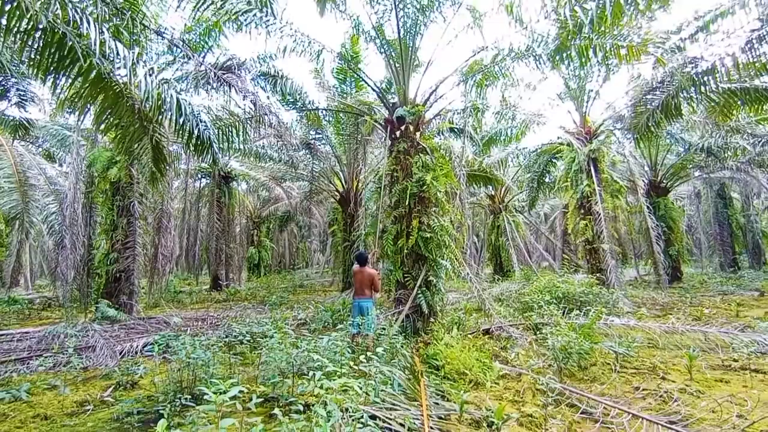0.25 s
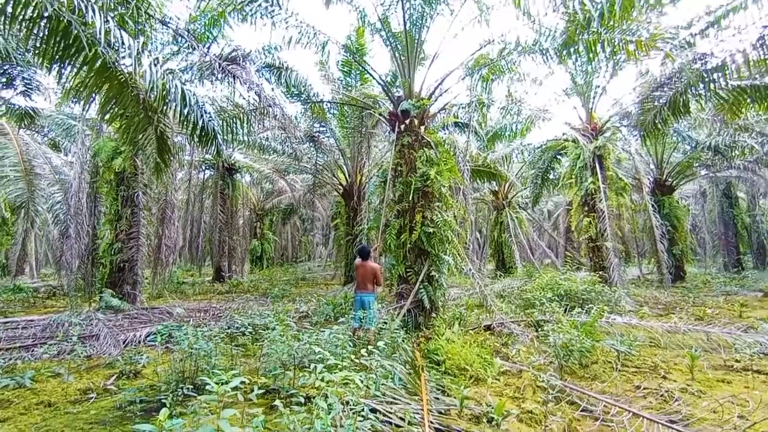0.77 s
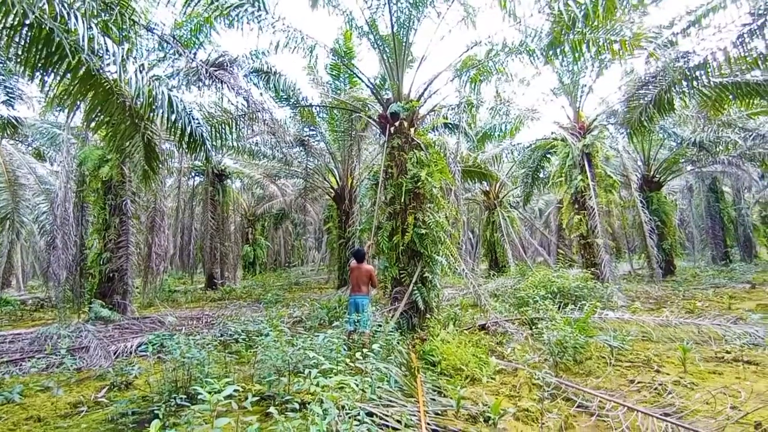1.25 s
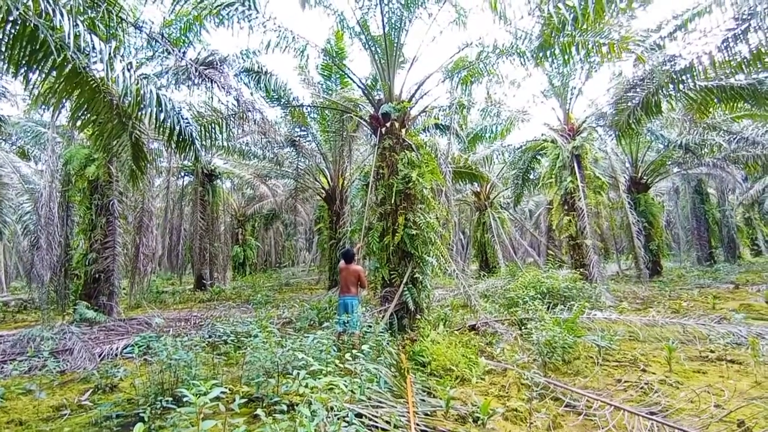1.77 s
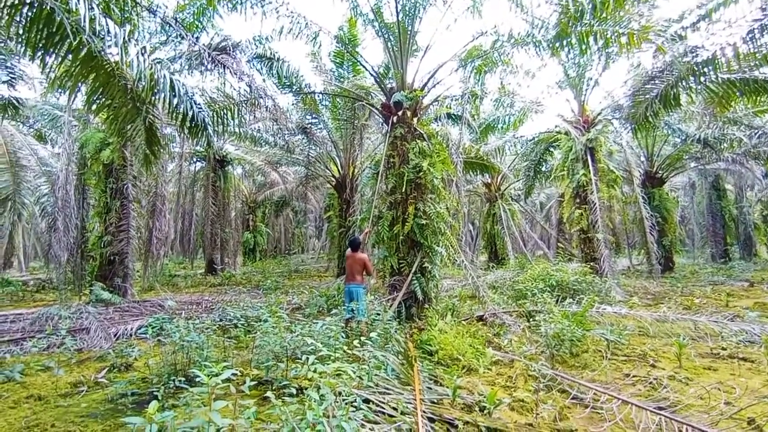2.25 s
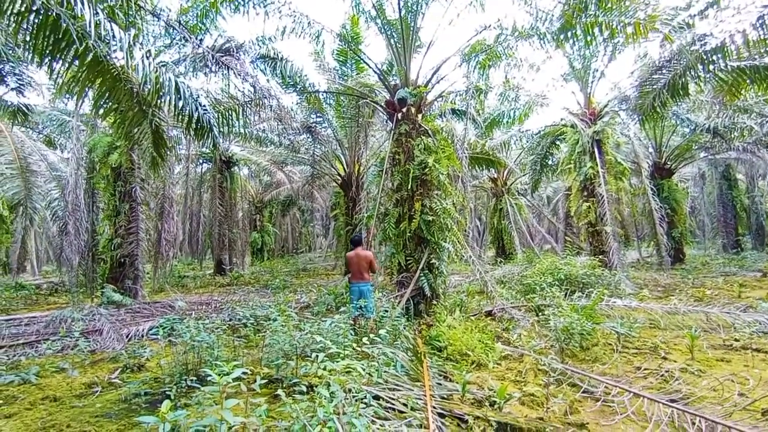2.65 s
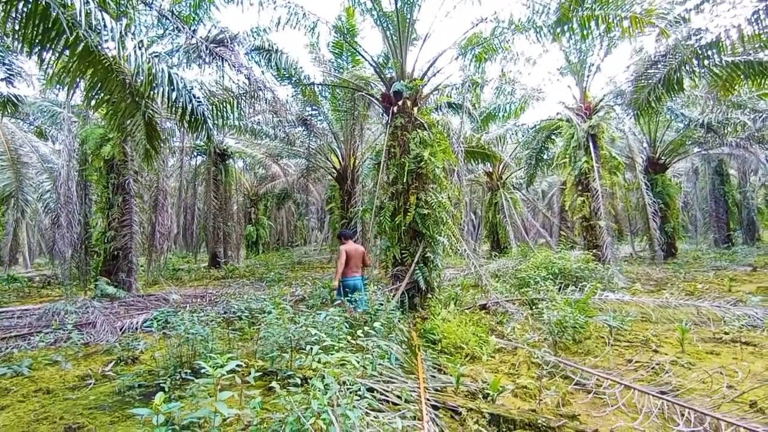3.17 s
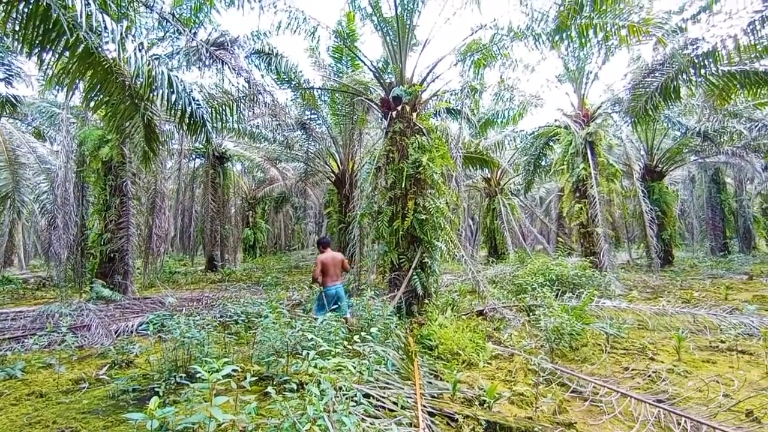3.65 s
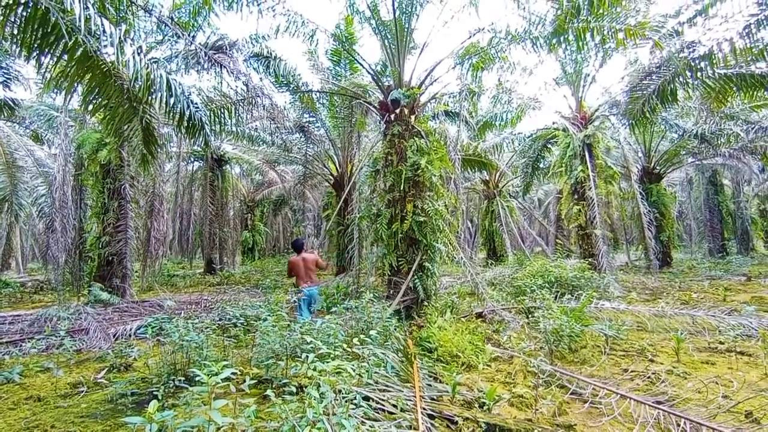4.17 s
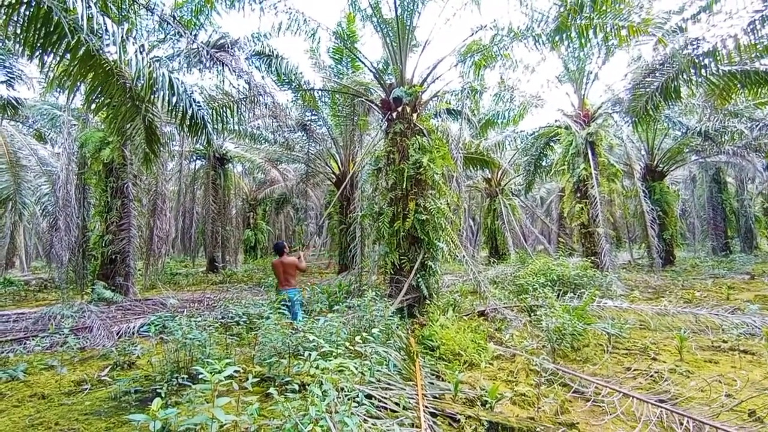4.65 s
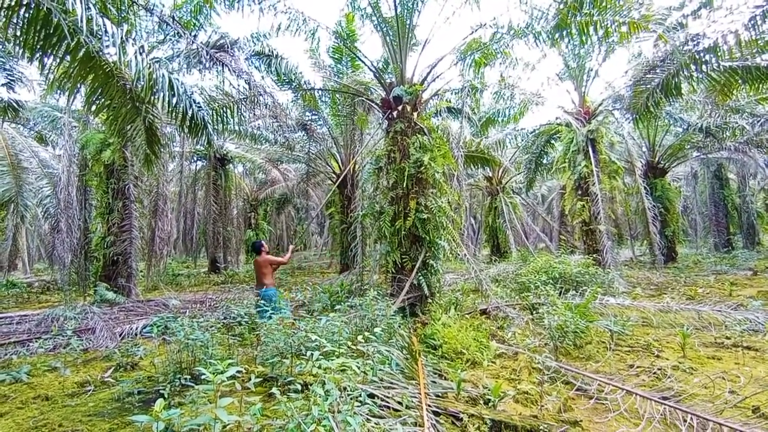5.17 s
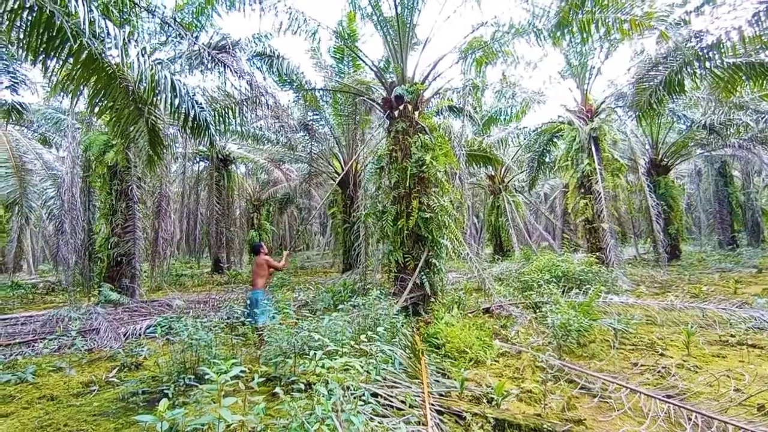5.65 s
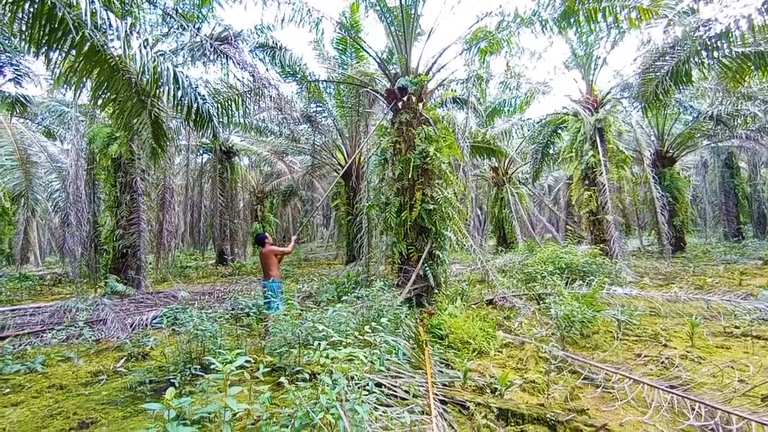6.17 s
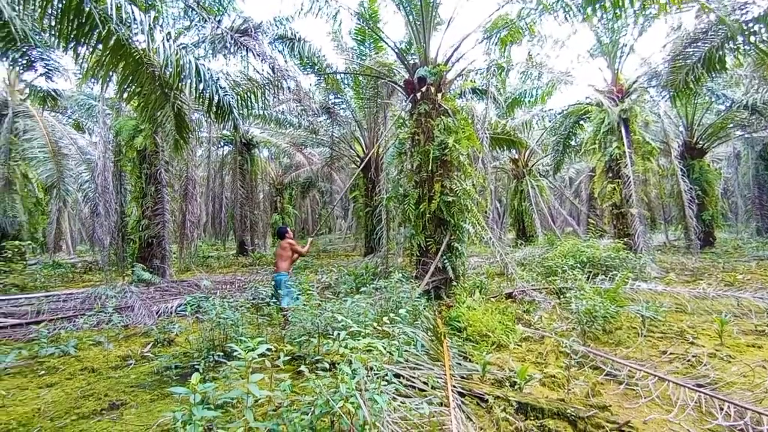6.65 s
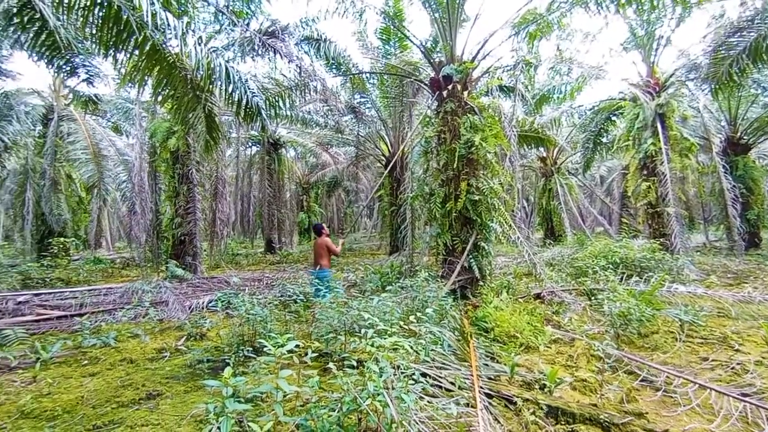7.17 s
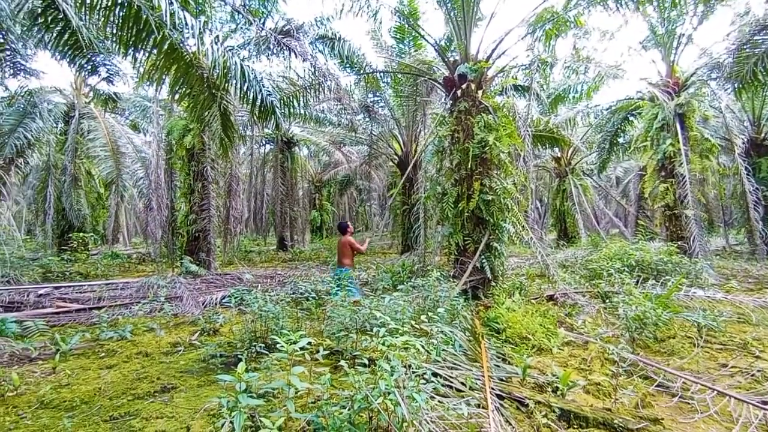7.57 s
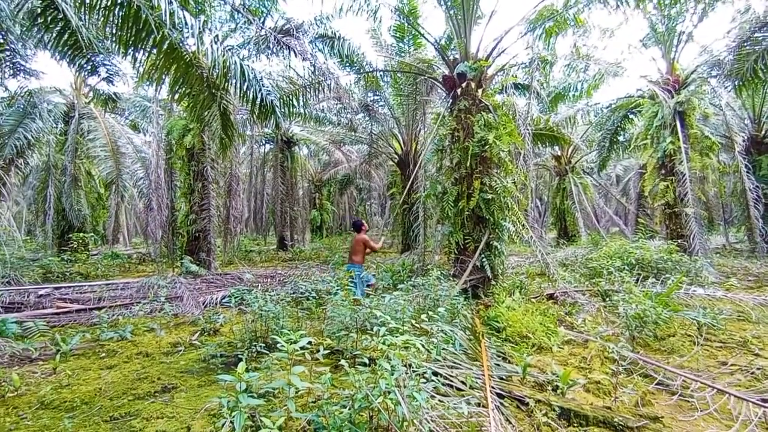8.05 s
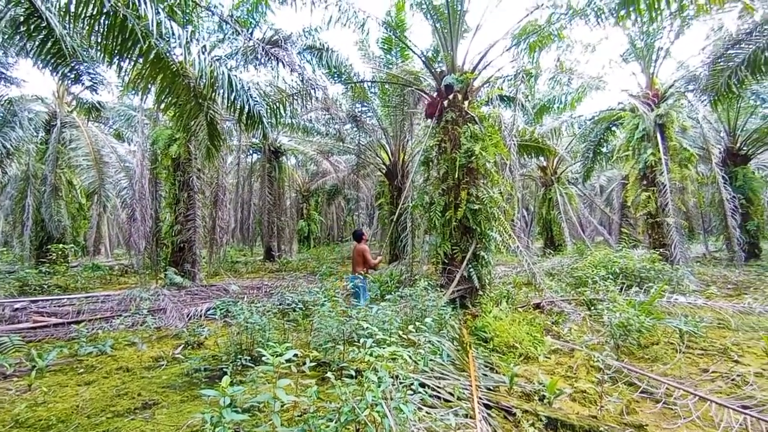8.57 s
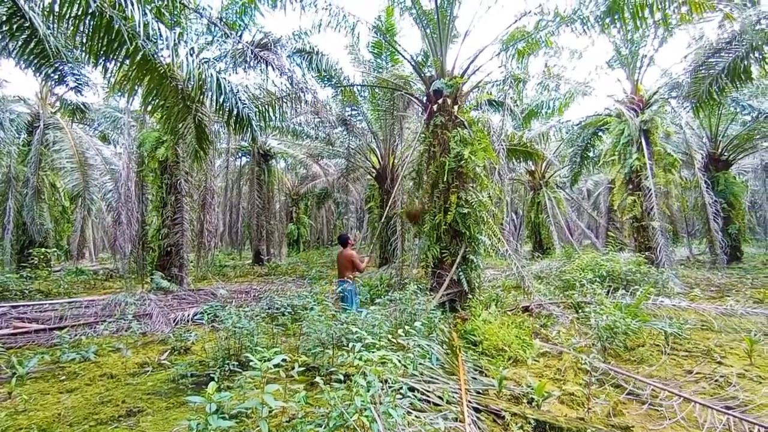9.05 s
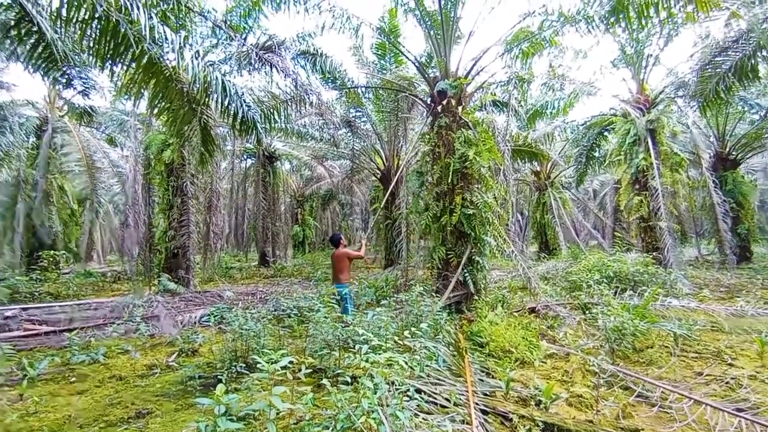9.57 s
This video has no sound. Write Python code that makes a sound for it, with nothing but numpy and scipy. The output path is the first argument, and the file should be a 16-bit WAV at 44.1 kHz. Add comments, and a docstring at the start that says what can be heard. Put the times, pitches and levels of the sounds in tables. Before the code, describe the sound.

Outdoors in a palm grove, a few metres from a stereo microphone, a sickle on a hollow pole knocks irregularly among dry snaps and light rustle. After a quieter gap, cracks build to one very loud snap that shakes the leaflets. Scrapes and hollow knocks follow in clusters, then rustling swells and a cut load lands with a soft thud. Faint insect hiss and low hum continue throughout.

```python
"""Under palms, a few metres from a two-port microphone, a sickle on a long hollow pole works in the fronds.
First the pole knocks amid dry snaps and rustle; near 2.4 s a far bird peeps; at 3.9 s the loudest snap
shakes the leaflets. From 5.7 s scrapes and knocks return, and at 9.5 s a cut load thuds down. Insects hiss
over a low hum throughout. Shaped noise makes rustle and snaps, and rings resonances as pole and trunk;
gliding sines make thunks and bird. Left and right differ most in the treble; leaflets peak near 10 kHz."""
import sys
import numpy as np
from scipy import signal
from scipy.fft import irfft, next_fast_len
from scipy.io import wavfile
from scipy.ndimage import uniform_filter1d

SR = 44100
rng = np.random.default_rng(int(sys.argv[2]) if len(sys.argv) > 2 else 0)


def unload_audio(sound):
    """Save the sound as a 16-bit wav file, at the path given as the first command line argument."""
    columns = np.transpose(np.atleast_2d(sound))
    # keep every value between -1 and 1, then stretch to whole-number steps
    steps = np.round(np.clip(columns, -1, 1) * 32767)
    wavfile.write(sys.argv[1], SR, steps.astype(np.int16))


def linear_from_db(decibels):
    """Turn decibels (scalar or array-like) into linear amplitude factors; 0 gives 1."""
    return 10 ** (np.asarray(decibels, float) / 20)


N = 433042  # samples
TIME = np.arange(N) / SR  # s
SIZE = next_fast_len(N)
HZ = np.arange(SIZE // 2 + 1) * SR / SIZE + 1e-3  # just above zero, so that its log exists


def on_hz(points):
    """A (Hz, value) table read at every frequency bin, along log frequency."""
    hz, value = np.transpose(points)
    return np.interp(np.log(HZ), np.log(hz), value)


def unit(x):
    """Scaled to rms 1."""
    return x / np.sqrt(np.mean(x ** 2))


def pair(alike, points):
    """Noise of rms 1 with a (Hz, dB) spectrum for both ports, as alike per frequency as the table says."""
    likeness = np.clip(on_hz(alike), -1, 1)
    mid, side = rng.standard_normal((2, len(HZ), 2)) @ [1, 1j]
    opposite = np.array([[1], [-1]])
    both = mid * np.sqrt(1 + likeness) + side * np.sqrt(1 - likeness) * opposite
    return unit(irfft(both * linear_from_db(on_hz(points)), SIZE)[:, :N])


def walk(rate):
    """Random levels held 1 / rate s and slewed; rms 1."""
    hold = int(SR / rate)
    steps = np.repeat(rng.standard_normal(N // hold + 1), hold)
    return unit(uniform_filter1d(steps, hold)[:N])


def crackle(rate, spread_db, t60):
    """Envelope of rms 1 made of random contacts, a few far louder than the rest."""
    loudness = linear_from_db(spread_db * np.minimum(rng.exponential(size=N), 2.4))
    hits = (rng.random(N) < rate / SR) * loudness
    return unit(signal.lfilter([1], [1, -1000 ** (-1 / (t60 * SR))], hits))


def blows(times, db, t60, rise=0.00092):
    """Envelopes, one for each row of db, that swell fast at each blow and die away."""
    gains = linear_from_db(np.atleast_2d(db))
    out = np.zeros((len(gains), N))
    for start, gain, decay in zip(times, gains.T, t60):
        first = int(start * SR)
        decay = np.clip(decay, .003, .4)
        age = TIME[:min(N - first, int(decay * SR))]
        shape = (1 - np.exp(-age / rise)) * 1000 ** (-age / decay)
        out[:, first:first + len(age)] += gain[:, None] * shape
    return out


def swells(times, db, rise, fall):
    """Envelopes, one for each row of db, that climb 20 dB in rise s to each peak and drop 20 dB in fall s."""
    db = np.atleast_2d(db)
    power = np.zeros((len(db), N))
    rise, fall = np.maximum(rise, .002), np.maximum(fall, .002)
    for peak, top_db, up, down in zip(times, db.T, rise, fall):
        span = slice(max(int((peak - 2 * up) * SR), 0), int((peak + 2 * down) * SR))
        t = TIME[span] - peak
        drop_db = 20 * np.maximum(-t / up, t / down)
        power[:, span] += linear_from_db(2 * (top_db[:, None] - drop_db))
    return np.sqrt(power)


def mode(x, hz, width, db):
    """One two-pole resonance, about db at its centre."""
    r = np.exp(-np.pi * width / SR)
    poles = [1, -2 * r * np.cos(2 * np.pi * hz / SR), r * r]
    return linear_from_db(db) * (1 - r) * signal.lfilter([1, 0, -1], poles, x)


# likeness of left and right for sounds a few metres off: pitch_hz, correlation
ALIKE_NEAR = [(60, 0.87), (200, 1), (1400, 0.78), (3000, 0.27), (5000, 0.012), (15000, -0.09)]
# knocks of the pole, before its modes: start_s, level_db, thud_db (push on the trunk), favoured pitch_hz
KNOCKS = [(0.208, -54, -68, 1250), (0.235, -44, -79, 1620), (0.325, -57, -81, 1600),
          (0.379, -48, -63, 1100), (0.419, -45, -53.5, 2310), (0.454, -48, -71, 2780),
          (0.611, -54, -55.5, 3000), (0.734, -53.5, -58.5, 1170), (0.919, -50.5, -68, 2300),
          (0.973, -42.5, -55, 2910), (1.037, -42.5, -61, 1740), (1.162, -50.5, -51, 1520),
          (1.238, -53, -59, 1060), (1.321, -41, -50, 1470), (1.349, -49, -50, 627), (1.435, -36, -54, 633),
          (1.508, -57, -54, 716), (1.545, -43.5, -72, 1540), (1.683, -43, -55, 1490),
          (1.758, -48.5, -57, 1540), (1.841, -52, -74, 1030), (1.899, -51, -80, 1500),
          (1.94, -44.5, -57, 1550), (2.038, -50, -67, 1160), (2.108, -54, -61, 1070),
          (2.125, -43.5, -64, 1060), (2.219, -53.5, -68, 657), (2.48, -59, -68, 657),
          (3.067, -55, -63, 694), (3.529, -45, -55.5, 2990), (3.927, -36, -59, 2680),
          (4.194, -53.5, -73, 2710), (4.357, -46, -63, 1720), (4.397, -41, -53, 1170),
          (4.527, -43, -69, 2880), (4.953, -54, -59.5, 740), (5.126, -60.5, -66, 1600),
          (5.757, -50, -58, 1570), (5.784, -46, -63, 1640), (5.844, -51, -68, 1660),
          (6.164, -42.5, -56, 1390), (6.212, -41, -53, 1710), (6.245, -34.5, -51, 1540),
          (6.292, -49, -69, 1560), (6.312, -42, -76, 1720), (6.507, -42.5, -61, 1720),
          (6.576, -44, -56.5, 2360), (6.689, -53, -62, 606), (6.722, -38, -62, 1060),
          (6.819, -34.5, -53, 1620), (6.85, -56, -58, 1630), (6.881, -37.5, -60, 1720),
          (7.013, -70, -59.5, 600), (7.097, -48, -65, 2960), (7.473, -31, -49, 1500),
          (7.517, -32.5, -53, 1590), (7.552, -33, -58, 1630), (7.616, -43, -68, 1510),
          (7.804, -53, -76, 1580), (8.024, -56, -55.5, 1070), (8.122, -40, -60, 1560),
          (8.471, -53, -60, 1190), (8.72, -50, -54.5, 1680), (8.758, -43.5, -59, 1080),
          (8.805, -34.5, -67, 680), (8.828, -43, -51, 1380), (9.062, -41, -65, 596), (9.215, -40, -66, 705),
          (9.279, -52, -66, 2900), (9.426, -36, -39.5, 614), (9.5, -42, -48, 1890),
          (9.555, -29.5, -63, 600), (9.58, -39, -46, 684), (9.645, -41.5, -77, 1990),
          (9.796, -46, -53, 710)]
# blade dragged over fibre, before the modes: peak_s, pole_db, trunk_db, rise_s and fall_s (20 dB each)
SCRAPES = [(0.242, -41.5, -41, 0.032, 0.018), (5.686, -38.5, -39.5, 0.046, .055),
           (5.76, -57.5, -56, .03, 0.18), (6.167, -51, -51.5, 0.029, 0.038),
           (6.215, -47, -50, 0.013, 0.051), (6.512, -61, -67, 0.017, 0.025), (6.584, -62, -64, .035, 0.016),
           (6.721, -34.5, -61, 0.014, .07), (6.745, -36.5, -47, .05, 0.042),
           (6.771, -32.5, -34, 0.063, 0.015), (6.883, -42, -47.5, 0.038, 0.024),
           (7.48, -50, -50, 0.09, 0.014), (7.522, -49, -42.5, 0.011, 0.076),
           (7.616, -36, -53, 0.0045, 0.016), (8.122, -58.5, -49.5, 0.087, 0.059),
           (8.806, -77, -48.5, 0.02, .05), (9.43, -53, -49.5, 0.43, .05),
           (9.478, -41.5, -39.5, 0.035, 0.22)]
# modes of the hollow pole: pitch_hz, width_hz, level_db
POLE = [(708, 300, -2), (1084, 31, 1.5), (1208, 134, -0.5), (1540, 156, 2.5), (1720, 33, 1.5),
        (2160, 330, -3.5), (2930, 830, -0.5), (3620, 54, 10.5)]
# modes of trunk and stalks: pitch_hz, width_hz, level_db
TRUNK = [(222, 59, 1.5), (285, 147, 1.5), (408, 46, -3.5), (597, 94, -4.5)]
# spectrum of the push of fibre on the pole: pitch_hz, level_db (per Hz)
FIBRE = [(250, -19), (700, 1), (2200, 0.5), (4500, -14.5), (8000, -28)]
# spectrum of the push on the trunk: pitch_hz, level_db (per Hz)
BARK = [(60, -17), (180, 1), (700, 3.5), (1500, -5), (4000, -23)]
RATTLE_T60_S, THUD_T60_S = 0.049, 0.069


def pole():
    """Knocks and stick-slip scraping ring the hollow pole and the trunk it leans on."""
    start, level_db, thud_db, struck_hz = np.transpose(KNOCKS)
    peak, pole_db, trunk_db, rise, fall = np.transpose(SCRAPES)
    mode_hz = np.array(POLE)[:, :1]
    slips = 0.26 + 0.5 * crackle(420, 4.0, 0.0061)
    # where a knock lands decides which modes it favours
    favour_db = -8.0 * np.abs(np.log2(mode_hz / struck_hz))
    # the blade drags near where the pole knocks
    drag_hz = np.interp(peak, start, struck_hz)
    drag_db = pole_db + 2.5 - 2.1 * np.abs(np.log2(mode_hz / drag_hz))
    scrape_pole = slips * swells(peak, drag_db, rise, fall)
    scrape_trunk = slips * swells(peak, trunk_db, rise, fall)
    # each knock is a hard first contact and a rattle after it
    contact = blows(start, level_db + 0.5 + favour_db, 0 * start + 0.0079, rise=0.00026)
    rattle = blows(start, level_db - 0.5 + favour_db, 0 * start + RATTLE_T60_S)
    thud = blows(start, thud_db + 5.5, 0 * start + THUD_T60_S, rise=0.0036)
    pushes = scrape_pole + contact + rattle
    fibre = pair(ALIKE_NEAR, FIBRE)
    on_trunk = pair(ALIKE_NEAR, BARK) * (scrape_trunk + thud)
    pole_ring = sum(mode(fibre * push, *row) for push, row in zip(pushes, POLE))
    return pole_ring + sum(mode(on_trunk, *row) for row in TRUNK)


# dry snaps: start_s, level_db, coarse_db (coarse body against the crack)
SNAPS = [(0.206, -38, -18), (0.227, -37.5, -2), (0.4218, -32.5, -5), (0.4555, -33, -9), (0.611, -43, 5),
         (0.8035, -41, -7.5), (0.9712, -41.5, 0.5), (1.126, -41, -22), (1.384, -39, -32),
         (1.4434, -33, -28), (1.6029, -36, -21), (1.7878, -36, -29), (1.9403, -40.5, -32),
         (1.9927, -41, -30), (2.592, -47, -31), (3.068, -49, -11), (3.3628, -45, -29), (3.48, -37, -8),
         (3.557, -33.5, -5), (3.6502, -23.5, -21), (3.692, -26.5, -32), (3.7452, -41, -19),
         (3.819, -25.5, -27), (3.845, -24, -23), (3.9063, -37, -31), (3.9293, -10, -13),
         (4.039, -24.5, -37), (4.1542, -29.5, -29), (4.2371, -26, -21), (4.5182, -41, -10),
         (4.537, -39, -27), (5.0067, -43, -16), (6.0888, -43.5, -9), (6.214, -26, -30),
         (6.4286, -41.5, -26), (6.554, -39.5, -9), (6.5786, -43, 2.5), (6.72, -36, -21),
         (6.879, -29.5, -20), (7.4235, -35.5, -30), (7.468, -39, -5), (7.5173, -41, 2), (7.5523, -41, 7.5),
         (7.6155, -34, 0), (7.7526, -41, -28), (8.02, -41, -29), (8.122, -45, -2), (8.4607, -32.5, -33),
         (8.478, -35, -24), (8.556, -27, -38), (8.996, -33, -24), (9.0997, -44, -16), (9.2787, -38, 6),
         (9.3028, -33, -13), (9.3482, -27, -16), (9.393, -26, -26), (9.421, -24.5, -17), (9.553, -31, -18),
         (9.7992, -26, -11)]
# side on which the stalks break: time_s, left_minus_right_db
SNAP_SIDE = [(0.3, 1.5), (1.3, -1.5), (3.5, 2.5), (3.82, 4), (4.05, 2), (6.0, -2.5), (9.0, 1), (9.8, 1)]
# bright spectrum of cracks and leaflets: pitch_hz, level_db (per Hz)
LEAFLETS = [(1760, -41), (3000, -13), (4030, -12), (4470, -12), (6760, -9.5), (9940, 2), (10900, -0.5),
            (11600, -5.5), (13000, -9.5), (14800, -17), (16000, -9)]
# spectrum of snap bodies and thicker ribs: pitch_hz, level_db (per Hz)
COARSE = [(500, -32.5), (1200, -6.5), (2500, -1), (4000, 0.5), (6000, -3.5), (9000, -7)]
SNAP_T60_S = 0.046  # splinters of the crack; those of the body last 1.48 times as long


def snaps():
    """A breaking stalk gives a sharp crack, then splinters dying away, each with a coarser body."""
    start, level_db, coarse_db = np.transpose(SNAPS)
    side_db = np.interp(start, *np.transpose(SNAP_SIDE))
    t60 = 0 * start + SNAP_T60_S
    peak_db = level_db + np.array([side_db, -side_db]) / 2
    body_db = peak_db + coarse_db
    crack = blows(start, peak_db + 3, 0 * start + 0.005, rise=.0001)
    crack = crack + blows(start, peak_db - 9.5, t60)
    body = blows(start, body_db + 1, 0 * start + 0.0072, rise=.0002)
    body = body + blows(start, body_db - 5.5, 1.48 * t60)
    return crack * pair(ALIKE_NEAR, LEAFLETS) + body * pair(ALIKE_NEAR, COARSE)


# hollow thunks of a bent stalk relaxing: start_s, level_db, start_hz, end_hz, t60_s
THUNKS = [(.557, -46, 600, 215, 0.09), (1.013, -39, 460, 200, 0.03), (3.928, -37, 855, 770, 0.014),
          (6.764, -39.5, 340, 200, 0.065)]
SAG_S = 0.0151  # time constant of the pitch sag


def thunks():
    """A tone whose pitch sags as a bent stalk relaxes, shaken by tearing fibres, holds and stops."""
    out, fibres = 0, pair(ALIKE_NEAR, BARK)
    for start, db, start_hz, end_hz, t60 in THUNKS:
        t = np.maximum(TIME - start, 0)
        turns = end_hz * t + (start_hz - end_hz) * SAG_S * (1 - np.exp(-t / SAG_S))
        # the shaking fades with its own time constant, 26 ms
        shake = np.exp(-t / 0.026) * walk(250)
        tone = linear_from_db(5 * shake) * np.sin(2 * np.pi * (turns + .16 * shake))
        envelope = (1 - np.exp(-t / .002)) * 1000 ** -(t / t60) ** 2
        out = out + linear_from_db(db) * envelope * (tone + 0.34 * fibres)
    return out


# sway of the fronds: time_s, rustle_db, heavy_db (ribs and stalks against leaflets)
SWAY = [(0.0, -64.5, -4), (0.16, -63, -6.5), (0.4, -62, -4.5), (0.72, -56.5, -8.5), (1.1, -56, -5.5),
        (1.5, -55.5, -8), (2.32, -68.5, -5.5), (3.42, -55.5, -13.5), (3.56, -44, -20), (3.85, -36.5, -13.5),
        (4.04, -38.5, -20), (4.14, -48, -15.5), (4.56, -56.5, -12), (4.66, -57, -15), (5.58, -66, -11),
        (6.12, -69.5, -6), (6.95, -58.5, -10), (7.24, -64, -9), (7.48, -47.5, -14), (7.64, -51.5, -7.5),
        (7.88, -61.5, -4.5), (8.4, -57.5, -8.5), (8.9, -51.5, -6), (8.96, -44.5, -3.5), (9.3, -43.5, -7.5),
        (9.46, -33.5, -9), (9.71, -44, -8.5), (9.82, -43.5, -12)]
# jerks of the pole that shake the leaflets: peak_s, level_db, rise_s and fall_s (20 dB each)
SHAKES = [(0.24, -44, 0.042, 0.064), (0.43, -50.5, 0.041, 0.15), (0.62, -49, 0.018, 0.08),
          (1.45, -66, 0.059, 0.45), (3.57, -41, .04, 0.058), (3.934, -23, 0.0058, 0.11),
          (4.25, -40, 0.032, 0.2), (4.54, -53.5, 0.065, 0.29), (5.69, -46.5, 0.076, 0.14),
          (6.225, -51.5, 0.067, 0.34), (6.6, -53.5, 0.13, 0.31), (6.725, -38.5, 0.015, 0.19),
          (6.76, -40, 0.034, 0.062), (7.05, -60.5, 0.089, 0.45), (8.14, -51, 0.069, 0.12),
          (8.47, -47, 0.037, .25), (8.56, -53.5, 0.041, 0.43)]
# spectrum of the stalk rumble: pitch_hz, level_db (per Hz)
RUMBLE = [(40, -30), (120, -8.5), (250, -3.5), (600, -6.5), (1200, -15), (2500, -16.5)]
# stalk rumble at a rustle of -55 dB, and dB gained per dB of rustle and of heaviness
STALK_DB, STALK_PER_RUSTLE, STALK_PER_HEAVY = -57.5, 0.71, 1


def foliage():
    """Leaflets brush in a dense crackle; thicker ribs add a coarser one, stalks a rumble."""
    time, sway_db, heavy_db = np.transpose(SWAY)
    heavy_db = np.interp(TIME, time, heavy_db)
    sway = linear_from_db(np.interp(TIME, time, sway_db))
    rustle = np.hypot(sway, swells(*np.transpose(SHAKES))[0])
    rustle_db = 20 * np.log10(rustle)
    stalk_db = STALK_DB + STALK_PER_RUSTLE * (rustle_db + 55) + STALK_PER_HEAVY * heavy_db
    leaf_grain = 0.86 + 0.34 * crackle(300, 6.5, 0.005)
    rib_grain = 0.91 + 0.5 * crackle(120, 8.7, 0.016)
    stalk_grain = 0.84 + 0.57 * crackle(60, 3.7, 0.091)
    leaves = pair(ALIKE_NEAR, LEAFLETS) * leaf_grain * rustle * linear_from_db(1.3 * walk(30))
    ribs = pair(ALIKE_NEAR, COARSE) * rib_grain * rustle * linear_from_db(heavy_db + 2.2 * walk(25))
    stalks = pair(ALIKE_NEAR, RUMBLE) * stalk_grain * linear_from_db(stalk_db)
    return leaves + ribs + stalks


# thump of the falling load on the ground: level_db, pitch_hz, t60_s
LANDING = (-43, 54, 0.2)
LANDING_S = 9.48


def landing():
    """A soft low thump of the ground, with a rumble of the load settling."""
    db, hz, t60 = LANDING
    t = np.maximum(TIME - LANDING_S, 0)
    thump = linear_from_db(db) * np.sin(2 * np.pi * hz * t) * (1 - np.exp(-t / 0.016)) * 1000 ** (-t / t60)
    rumble = pair(ALIKE_NEAR, [(40, -30), (70, -7), (150, -1), (260, -26.5)])
    settling = linear_from_db(-46.5) * rumble * (1 - np.exp(-t / .02)) * 1000 ** (-t / 0.59)
    return thump + settling


# even spectrum of the echo wash: pitch_hz, level_db
FLAT = [(20, 0), (20000, 0)]


def echoes(x, db=-14, t60=0.27):
    """Trunks and fronds scatter each sound back as a short wash, from 6 ms on."""
    t = TIME[:SR // 3]
    wash = pair(ALIKE_NEAR, FLAT)[:, :len(t)] * 1000 ** (-t / t60) * (t > .006)
    wash = wash / np.linalg.norm(wash[0])
    return linear_from_db(db) * signal.oaconvolve(x, wash, axes=1)[:, :N]


# faint far bird notes: start_s, level_db, start_hz, end_hz, length_s
BIRD = [(2.398, -74, 2310, 2670, 0.047), (4.74, -80, 1680, 1620, 0.14), (5.375, -74, 2300, 2130, .1)]


def bird():
    """Short soft whistles: sines that glide evenly under a half-sine envelope."""
    out = 0
    for start, db, start_hz, end_hz, length in BIRD:
        t = np.clip(TIME - start, 0, length)
        turns = start_hz * t + (end_hz - start_hz) * t ** 2 / (2 * length)
        out = out + linear_from_db(db) * np.sin(np.pi * t / length) * np.sin(2 * np.pi * turns)
    return out


# likeness of left and right for distant sound: pitch_hz, correlation (held within -1 to 1 when read)
ALIKE_FAR = [(60, -0.55), (130, 0.68), (3000, -1.85), (5500, 0.13), (7000, -0.27), (15000, 0.33)]
# spectrum of the distant hum and hiss: pitch_hz, level_db (per Hz)
GROVE = [(15, -44), (25, -79), (43, -4), (161, 3), (695, -16.5), (936, -24), (1890, -20), (2480, -40),
         (5880, -28), (6920, -6), (7920, -17), (9320, -6), (12900, -30), (14400, -20), (16000, -59)]
# insect choirs: pitch_hz, width_hz, level_db, throb_hz, throb_depth (0-1)
INSECTS = [(7094, 480, -66, 82.6, .5), (9190, 680, -62, 130, .18), (14100, 1200, -74, 82.6, .5)]
GROVE_DB = -65  # rms of hum and hiss


def grove():
    """Smooth distant hum and hiss, and insect choirs that throb fast and waver slowly."""
    out = pair(ALIKE_FAR, GROVE) * linear_from_db(GROVE_DB + 0.11 * walk(4.5))
    for hz, width, db, throb_hz, depth in INSECTS:
        throb_turns = np.cumsum(throb_hz * (1 + .006 * walk(5))) / SR
        throb = 1 + depth * np.sin(2 * np.pi * throb_turns)
        band = [(hz - 3 * width, -70), (hz - width / 2, -5), (hz, 0),
                (hz + width / 2, -5), (hz + 3 * width, -70)]
        out += pair(ALIKE_FAR, band) * throb * linear_from_db(db + 0.45 * walk(2.23) + 0.38 * walk(40))
    return out


def scene():
    """The work, its echoes and the grove."""
    hits = pole() + snaps() + thunks()
    return hits + echoes(hits) + foliage() + landing() + bird() + grove()


def top_cut(x):
    """Nothing passes above the cut-off."""
    return signal.sosfilt(signal.butter(12, 16480, fs=SR, output="sos"), x)


def record(dry):
    """A steep low-pass cuts the top above 15.6 kHz."""
    low_pass = signal.ellip(8, .2, 60, 15600, fs=SR, output="sos")
    mix = signal.sosfilt(low_pass, dry)
    return top_cut(mix)


dry = scene()
out = record(dry)
unload_audio(out)
```